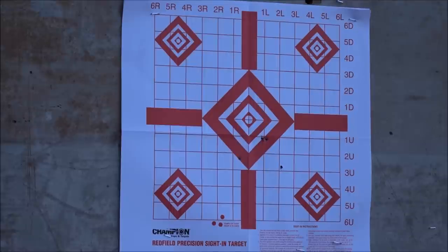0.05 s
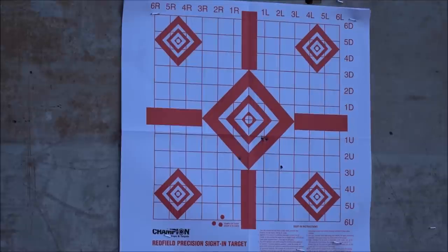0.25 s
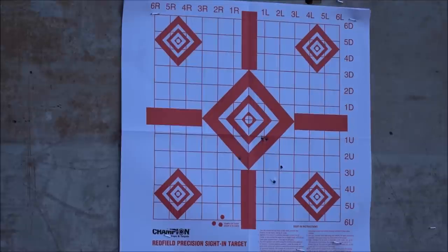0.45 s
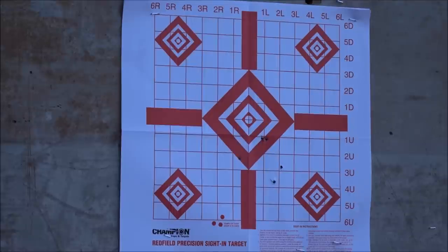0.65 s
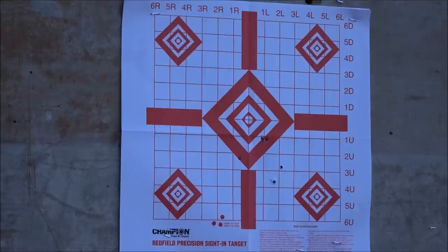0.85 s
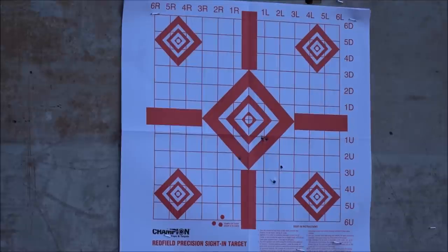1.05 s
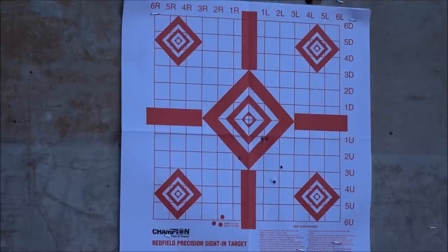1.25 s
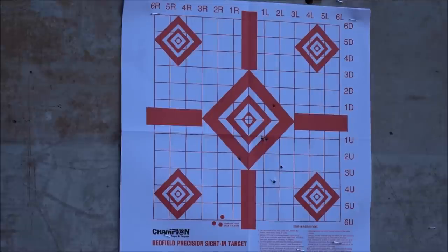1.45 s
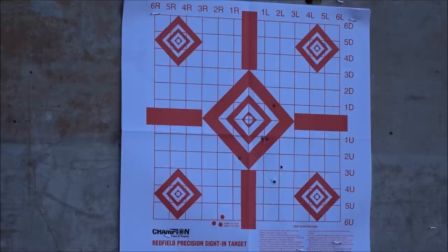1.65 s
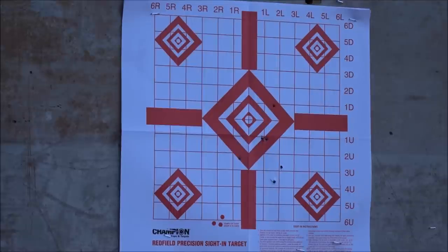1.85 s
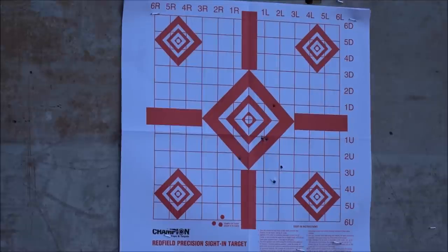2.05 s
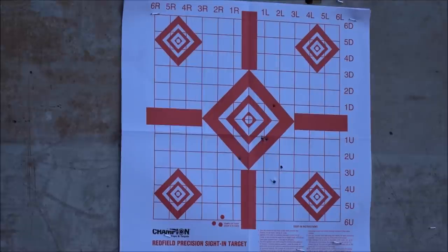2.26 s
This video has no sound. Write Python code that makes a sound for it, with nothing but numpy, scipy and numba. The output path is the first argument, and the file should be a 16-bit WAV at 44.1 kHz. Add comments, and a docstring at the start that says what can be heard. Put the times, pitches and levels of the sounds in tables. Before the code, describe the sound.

Two air rifle shots heard from beside a paper target outdoors: a hollow snap, a short pellet hiss, then a loud crack and knock on the board with a swishing tail; faint hum and insects beneath.

```python
"""Two air rifle shots at a target

An air rifle fires twice outdoors, heard from beside a paper target on a board: damped modes snap over a noise tail.
Swelling noise and a falling whoop make the pellet pass; it cracks into the board, whose damped tones thud and knock.
Trees and walls scatter the crack into a long swish of noise bands with late echoes. A motor hums as wavering tones
and insects sing as narrow noise; between the shots the swish stops short and the background shifts abruptly."""
import sys
import numpy as np
from scipy import signal
from scipy.fft import rfft, irfft
from scipy.io import wavfile
from scipy.ndimage import uniform_filter1d
from numba import njit

SR = 44100
rng = np.random.default_rng(int(sys.argv[2]) if len(sys.argv) > 2 else 0)


def transcribe(signal):
    """Save signal, clipped to [-1, 1], as a 16-bit WAV file at the path in sys.argv[1]."""
    frames = np.atleast_2d(signal).T
    limited = np.clip(frames, -1, 1)
    pcm = np.round(limited * 32767).astype(np.int16)
    wavfile.write(sys.argv[1], SR, pcm)


N = 101430

# The two shots. Each row: report in seconds, report level in dB, pellet passing in seconds, hiss level in dB,
# middle pitch of the whoop in Hz, level of the metal ring in dB, impact in seconds, impact level in dB.
SHOTS = [(0.2015, -17.5, 0.356, -29.5, 290, -38.5, .3843, -21),
         (1.3672, -18, 1.490, -31, 371, -56, 1.5172, -20.5)]
CENTRES = 30 * 2 ** np.arange(0, 9.2, 1 / 3)  # third-octave band centres, Hz
LAG_S = .00009  # between the microphone ports, for a source to the right


def report(t):
    """Hollow snaps and ringing metal of the rifle, right of centre, with the noisy scatter that trails them."""
    # Colour of the scatter. Each row: frequency in Hz, relative density in dB per Hz.
    tail_colour = [(150, -17), (250, -10.5), (544, -32), (705, -12.5), (1430, -13.5), (1670, -13),
                   (3110, -5), (4960, -13), (15500, -29)]
    tail_db, tail_t60_s = -22, 0.8
    tail = 0
    for start, db, *_ in SHOTS:
        tail = tail + undb(db + tail_db) * swell(t - start + 0.0077, 0.015, 0, tail_t60_s)
    snaps = np.array([rifle_snaps(t - LAG_S), rifle_snaps(t)])  # left hears them late
    scatter = tail * undb(0.6 * walk(300)) * noise(tail_colour, LAG_S)
    return pan(-3.5) * (snaps + metal_ring(t)) + pan(0.5) * scatter


def rifle_snaps(t):
    """Each snap of the rifle, or its slap off the ground and walls, sets the same damped modes going."""
    # Snaps and slaps. Each row: start in seconds, level in dB, pitch factor (a higher one also decays faster).
    snap_rows = [(.2024, -15, 1.08), (.2040, -15, 1.08), (1.3677, -24, .97), (1.3690, -12.5, 1.03),
                 (.1972, -34, 1.0), (.2160, -28, 1.08), (.2175, -22, 1.08), (.2275, -30, 1.08),
                 (.2390, -31, 1.0), (.2406, -27, 1.03), (.2500, -31, 1.04), (.2632, -32, 1.04),
                 (1.3625, -34, .96), (1.3800, -32, 1.0), (1.3830, -23, 1.02), (1.4056, -26, .95)]
    # Modes at pitch factor 1. Each row: frequency in Hz, level in dB, 60 dB decay time in seconds.
    snap_modes = [(2780, 1, 0.0055), (3700, -4.5, 0.002), (2430, -15, 0.0064), (1910, -8, 0.0031),
                  (1270, -13.5, 0.0071), (248, -29, 0.025), (6330, -9.5, 0.0032)]
    rise_s = .0002
    out = 0
    for start, db, pitch in snap_rows:
        since = t - start
        out = out + undb(db) * ring(since * pitch, snap_modes) * np.clip(since / rise_s, 0, 1)
    return out


def metal_ring(t):
    """A metal part of the rifle rings on as a beating pair of damped tones with a trembling level."""
    ring_hz, beat_hz, t60_s = 3160, 86.5, 0.25
    out = 0
    for start, _, _, _, _, db, *_ in SHOTS:
        out = out + ring(t - start, [(ring_hz, db, t60_s), (ring_hz - beat_hz, db - 4, t60_s)])
    return out * undb(0.82 * walk(80))


def pellet(t):
    """The pellet's rough hiss swells as it nears, crosses right to left with a low whoop and stops at the board."""
    # Colour of the passing hiss. Each row: frequency in Hz, relative density in dB per Hz.
    hiss_colour = [(2500, -16.5), (5000, -11.5), (7500, -7), (12500, -0.5), (15500, -4.5)]
    # Colour of the steadier hiss heard along the flight. Each row: frequency in Hz, relative density in dB per Hz.
    far_colour = [(250, -3), (1200, -2.5), (3000, -13), (6000, 1), (8500, 4.5), (12000, -9), (15500, -5.5)]
    far_db, rough_db = -17, 1.2
    rise_s, fall_s = 0.015, 0.017
    pan_db, sweep_s = 2.5, 0.0073
    again_before_s, again_db, again_s = 0.0064, -3, 0.009  # the hiss swells once more just before the board
    hiss = noise(hiss_colour) * undb(rough_db * walk(900))
    far = undb(far_db) * noise(far_colour)
    out = 0
    for shot, _, passing, db, whoop_hz, _, hit, _ in SHOTS:
        d = t - passing
        flying = (t < hit) * np.clip((t - shot) / 0.047, 0, 1)
        near = 1 / (1 + (d / np.where(d < 0, rise_s, fall_s)) ** 2)
        again = undb(again_db) / (1 + ((t - hit + again_before_s) / again_s) ** 2)
        side = pan(pan_db * np.tanh((d - .015) / sweep_s))
        air = side * (np.hypot(near, again) * hiss + far)
        out = out + undb(db) * flying * (air + whoop(d, whoop_hz))
    return out


def whoop(d, middle_hz):
    """A low fluttering tone that falls in pitch as the pellet passes; d is the time since passing."""
    drop, level_db, glide_s, late_s = .36, -18.5, 0.008, 0.0045  # drop: share of the middle pitch, either way
    u = (d - late_s) / glide_s
    hz = middle_hz * (1 - drop * np.tanh(u) + 0.0787 * walk(150))
    tone = np.sin(2 * np.pi * np.cumsum(hz) / SR)
    return undb(level_db + 2.5 * walk(150)) * tone * np.exp(-(u / 2.7) ** 2)


def impact(t):
    """Crack and thud of the board, the swish scattered back from all round, and late, duller echoes."""
    # Colour of crack and swish. Each row: frequency in Hz, relative density in dB per Hz.
    swish_colour = [(110, -45), (180, -15), (262, -18.5), (426, -20), (486, -15.5), (608, -11.5),
                    (820, -13), (1050, -7.5), (1130, -13), (1390, -8), (3470, 1.5), (7330, -6.5),
                    (15800, -24.5)]
    # Colour of the echoes before treble loss. Each row: frequency in Hz, relative density in dB per Hz.
    echo_colour = [(250, -16), (500, -35), (900, -10), (1500, -4.5), (3000, 1.5), (5500, -1.5),
                   (9000, -16.5), (15500, -41)]
    close = noise(swish_colour, -LAG_S / 2, split=True)
    late = noise(echo_colour, LAG_S, split=True)
    rough = undb(1.5 * walk(500))
    out = np.zeros((2, N))
    for (*_, hit, db), end in zip(SHOTS, (.991, N / SR)):  # the first impact stops short at 0.991 s
        on = slice(int(hit * SR), int(end * SR))
        d = t[on] - hit
        near = pan(2) * swish(d, close[..., on]) * rough[on]
        out[:, on] += undb(db) * (near + echoes(d, late[..., on]) + board(d))
    return out


def swish(d, bands):
    """A sharp crack, then noise bands that each hold and die at their own pace as trees and walls scatter it."""
    # Hold of the swish. Each row: frequency in Hz, time in seconds.
    hold_s = [(150, 0.074), (600, 0.05), (1500, 0.12), (4000, 0.09), (8000, 0.087), (15500, 0.061)]
    # Decay of the swish by 60 dB, on top of the sag. Each row: frequency in Hz, time in seconds.
    decay_s = [(150, 0.44), (600, 0.41), (1500, 0.26), (4000, 0.31), (8000, 0.33), (15500, 0.33)]
    rise_s, sag_db_per_s = .0003, 10.5
    crack_db, crack_t60_s = -3, 0.0046
    hz = CENTRES[:, None, None]
    scattered = undb(-sag_db_per_s * d) * swell(d, rise_s, at(hold_s, hz), at(decay_s, hz))
    crack = undb(crack_db) * swell(d, 0.00009, 0, crack_t60_s)
    return ((scattered + crack) * bands).sum(0)


def echoes(d, bands):
    """Late returns of the impact share one noise; each loses treble, and high bands die sooner."""
    # Echoes. Each row: delay in seconds, level in dB, rise in seconds, hold in seconds,
    # 60 dB decay time at 3 kHz in seconds, treble loss in dB per kHz, left over right in dB.
    echo_rows = [(0.092, -20, 0.056, 0.054, 1.1, 0.5, 0), (0.202, -18.5, 0.0055, 0.053, 0.72, 0.5, -3.5),
                 (0.422, -16, 0.0015, 0.0069, 0.045, 4, -4), (0.427, -18, 0.0027, 0.022, 0.16, 3.5, -1),
                 (.69, -25, 0.0027, 0.0062, 0.18, 3.5, 1)]
    hz = CENTRES[:, None, None]
    power = 0
    for lag, db, rise, hold, t60, loss_db, pan_db in echo_rows:
        env = swell(d - lag, rise, hold, t60 * (hz / 3000) ** -.25)
        power = power + (pan(pan_db) * undb(db - loss_db * hz / 1000) * env) ** 2
    return (np.sqrt(power) * bands).sum(0)


def board(d):
    """The board thuds in slow-rising low modes; the pellet's hard knock is followed by a lower one."""
    # Thud of the board. Each row: frequency in Hz, level in dB, 60 dB decay time in seconds.
    thud_modes = [(82, -31, 1), (191.3, -31.5, 0.34), (371, -26, 0.25), (405.4, -25.5, 0.087),
                  (435, -24, 0.22), (550, -24.5, 0.18), (606, -24.5, 0.042)]
    # Hard knock of the pellet. Each row: frequency in Hz, level in dB, 60 dB decay time in seconds.
    knock_modes = [(2085, -6.5, 0.035), (4720, -7, 0.024), (5700, 1, 0.0083), (12500, 1, 0.0027)]
    # Lower knock that follows. Each row: frequency in Hz, level in dB, 60 dB decay time in seconds.
    back_modes = [(544.4, -8.5, 0.063), (1182, 3, 0.026)]
    thud_rise_s, thud_hold_s = 0.0095, 0.042
    back_s, back_rise_s = 0.00299, 0.0046
    thud = 0
    for hz, db, t60 in thud_modes:
        thud = thud + undb(db) * np.sin(2 * np.pi * hz * d) * swell(d, thud_rise_s, thud_hold_s, t60)
    back = ring(d - back_s, back_modes) * np.clip((d - back_s) / back_rise_s, 0, 1)
    return thud + ring(d, knock_modes) + back


def ticks(t):
    """Single dry ticks close by, each one a smooth negative pulse."""
    # Ticks. Each row: time in seconds, peak level in dB, half width in seconds.
    tick_rows = [(.9619, -34, .00008), (.9909, -46, .0002)]
    return sum(-undb(db) * np.exp(-((t - s) / width) ** 2) for s, db, width in tick_rows)


def motor_hum(t):
    """A far motor hums in two partials that share an unsteady pitch and waver in level."""
    # Pitch of the first partial. Each row: time in seconds, frequency in Hz.
    hum_hz = [(0, 51.8), (.99, 52.43), (.992, 53.1), (2.3, 53.33)]
    # Hum level. Each row: time in seconds, rms of the first partial in dB, rms of the second in dB.
    hum_levels = [(0, -61, -65), (.18, -57, -59), (.25, -61, -57.5), (.35, -64, -63), (.42, -68, -62),
                  (.55, -64, -69), (.98, -65, -64.5), (.995, -52.5, -54.5), (1.5, -55.5, -58),
                  (1.545, -63, -70), (1.62, -61.5, -61), (2.04, -58, -65), (2.1, -64, -63),
                  (2.16, -63.5, -68), (2.3, -56, -48.5)]
    times, *levels = np.array(hum_levels).T
    hz = along(hum_hz, t) * (1 + 0.00706 * walk(6.64))
    phase = 2 * np.pi * np.cumsum(hz) / SR
    out = 0
    for k, db in enumerate(levels):
        level = 2 ** .5 * undb(np.interp(t, times, db) + 1.6 * walk(12))
        out = out + level * np.sin((k + 1) * phase)
    return out


def low_drone(t):
    """A second low tone wavers in pitch and comes and goes in level."""
    # Level of the drone. Each row: time in seconds, peak level in dB.
    drone_db = [(0, -66.5), (.14, -51.5), (.25, -69), (.36, -52), (.45, -71), (.66, -57), (.85, -64),
                (.98, -60), (1., -79)]
    hz = 140.8 * (1 + 0.017 * walk(10.5))
    return undb(along(drone_db, t) + 0.82 * walk(9.6)) * np.sin(2 * np.pi * np.cumsum(hz) / SR)


def insects(t):
    """Insects sing as narrow, trembling bands of noise."""
    # Singing bands. Each row: centre in Hz, width in Hz, rms level in dB before the common level.
    insect_bands = [(7790, 350, -82), (8070, 300, -80.5), (8780, 400, -78.5), (9180, 280, -76)]
    # Common level of the insects. Each row: time in seconds, level in dB.
    insect_level = [(0, -8), (.98, -5), (1., 1.5), (2.26, 2), (2.29, -11)]
    out = 0
    for hz, wide, db in insect_bands:
        band = signal.butter(2, [hz - wide / 2, hz + wide / 2], "band", fs=SR, output="sos")
        buzz = signal.sosfilt(band, rng.standard_normal((2, N)))
        out = out + undb(db + 1.3 * walk(60.5)) * buzz / buzz.std()
    return out * undb(along(insect_level, t))


def distant_air(t):
    """Low-heavy noise of the open air, every third-octave band drifting in level on its own."""
    # Colour of the air. Each row: frequency in Hz, relative density in dB per Hz.
    air_colour = [(15, -36), (25, -23), (49, -7), (113, -6), (291, -23.5), (791, -20), (1430, -20.5),
                  (1980, -19), (2500, -21.5), (3200, -29), (6490, -41), (8970, -40.5), (10500, -47.5),
                  (15800, -49.5)]
    # Level curve of the air. Each row: time in seconds, level in dB.
    air_level = [(0, -3.5), (.98, -1.5), (1., -0.5), (2.3, -1)]
    air = sum(band * undb(1.7 * walk(5.99)) for band in noise(air_colour, split=True))
    return undb(-54.5 + along(air_level, t)) * air


def noise(colour, lag=0., split=False):
    """Stereo noise of a colour and rms 1, left late by lag s; if split, in third-octave bands (bands, 2, N)."""
    # Likeness of left and right. Each row: frequency in Hz, likeness from 0 to 1.
    likeness = [(60, 1), (300, 0.87), (600, 0.76), (1200, 0.68), (2500, 0.29), (5000, 0.05), (9000, 0),
                (15000, 0.2)]
    lag_top_hz = 3580  # above it the lag fades
    hz = np.maximum(np.fft.rfftfreq(N, 1 / SR), 1)
    alike = np.clip(at(likeness, hz), 0, 1)
    mid, side = rfft(rng.standard_normal((2, N))) * np.sqrt([1 + alike, 1 - alike])
    shape = undb(at(colour, hz)) * (hz > .8 * colour[0][0])
    delay = np.exp(-2j * np.pi * hz * lag / (1 + (hz / lag_top_hz) ** 2))
    pair = np.array([(mid + side) * delay, mid - side]) * shape / np.sqrt(2 * np.mean(shape ** 2))
    if split:
        # neighbouring bands crossfade
        share = np.cos(np.pi / 2 * np.clip(3 * np.log2(hz / CENTRES[:, None]), -1, 1)) ** 2
        pair = (share[:, None] * pair).astype(np.complex64)
    return irfft(pair, N)


def undb(db):
    """Decibels to amplitude."""
    return 10 ** (np.asarray(db) / 20)


def at(table, hz):
    """Reads a (Hz, value) table on a log axis."""
    table_hz, values = np.array(table).T
    return np.interp(np.log(hz), np.log(table_hz), values)


def along(table, t):
    """Reads a (seconds, value) table with straight lines between the points."""
    return np.interp(t, *np.array(table).T)


def walk(rate):
    """Random levels held 1 / rate s and slewed twice; spread near 1."""
    k = max(int(SR / rate), 1)
    steps = np.repeat(rng.standard_normal(N // k + 1), k)
    return 1.25 * uniform_filter1d(uniform_filter1d(steps, k), k)[:N]


def swell(t, rise, hold, t60):
    """Rise, hold, then exponential decay by 60 dB in t60 seconds."""
    return np.clip(t / rise, 0, 1) * undb(-60 * np.clip(t - rise - hold, 0, None) / t60)


def ring(t, modes):
    """Damped modes set going at t = 0, neighbours in opposite phase."""
    t = np.clip(t, 0, None)
    out = 0
    for k, (hz, db, t60) in enumerate(modes):
        out = out + (-1) ** k * undb(db - 60 * t / t60) * np.sin(2 * np.pi * hz * t)
    return out


def pan(db):
    """Left and right gains that differ by db, positive to the left."""
    return undb(np.array([db, -db]) / 2).reshape(2, -1)


@njit
def follow(x, attack, release):
    """Level follower, quick up and slow down."""
    e, out = 0., np.empty(len(x))
    for i in range(len(x)):
        e += (x[i] - e) * (attack if x[i] > e else release)
        out[i] = e
    return out


def scene():
    """Adds the shots, the ticks and the background."""
    t = np.arange(N) / SR
    shots = report(t) + pellet(t) + impact(t)
    return shots + ticks(t) + motor_hum(t) + low_drone(t) + insects(t) + distant_air(t)


def record(dry):
    """Gain control pulls loud passages down, the level dips briefly, peaks are rounded and the top is cut off."""
    # Edges of the two-step dip, in seconds.
    gap_s = (2.2597, 2.277, 2.2923)
    # Level in each step of the dip, in dB.
    gap_db = (-24, -60)
    knee_db, ratio, attack_s, release_s = -29, 1.248, 0.0013, 0.088
    ceiling = undb(-7.5)  # of the converter
    level = follow(np.abs(dry).mean(0), 1 / (attack_s * SR + 1), 1 / (release_s * SR))
    gain = np.minimum(undb(knee_db) / (level + 1e-9), 1) ** (1 - 1 / ratio)
    t = np.arange(N) / SR
    gap = undb(np.array([0, *gap_db, 0])[np.searchsorted(gap_s, t)])
    rounded = ceiling * np.tanh(dry * gain * gap / ceiling)
    top_cut = signal.ellip(12, .2, 80, 15900, fs=SR, output="sos")
    return signal.sosfilt(top_cut, rounded)


dry = scene()
out = record(dry)
transcribe(out)
```